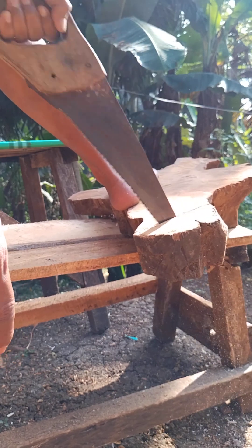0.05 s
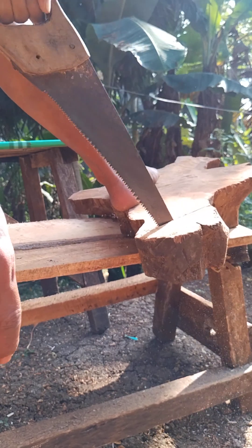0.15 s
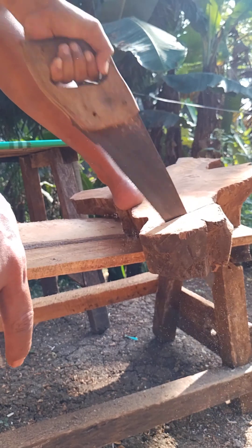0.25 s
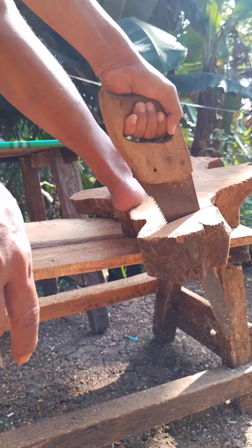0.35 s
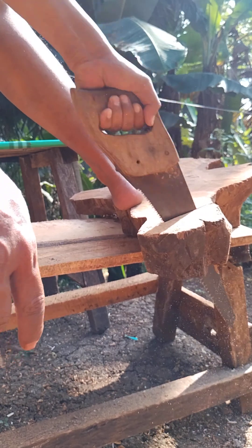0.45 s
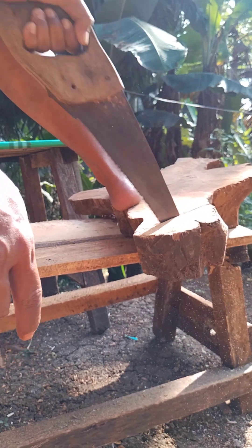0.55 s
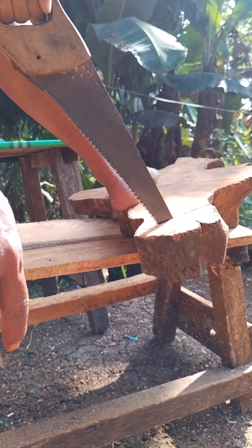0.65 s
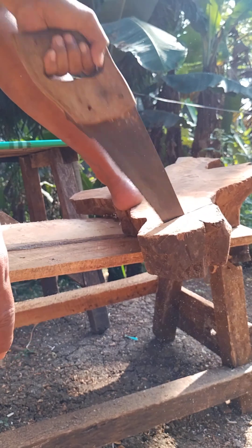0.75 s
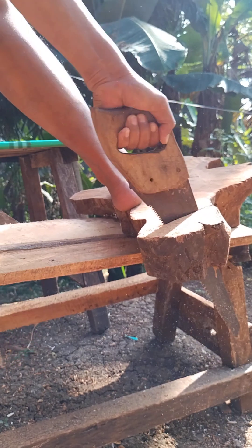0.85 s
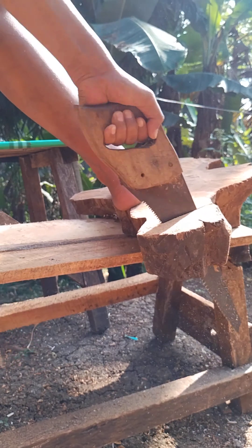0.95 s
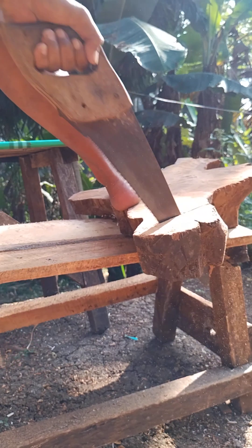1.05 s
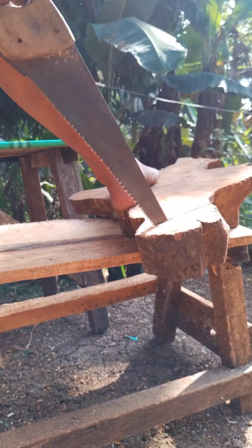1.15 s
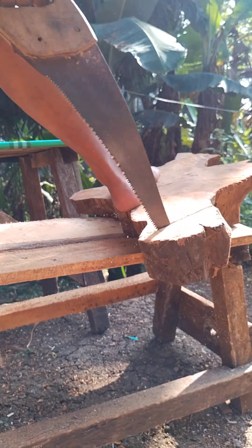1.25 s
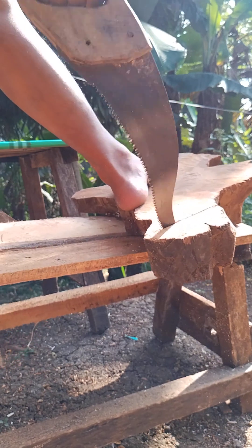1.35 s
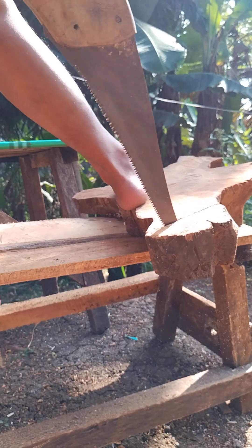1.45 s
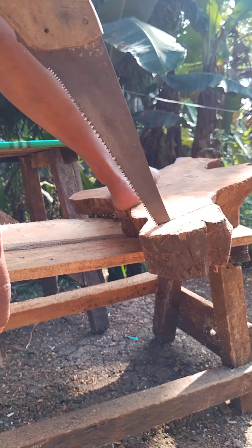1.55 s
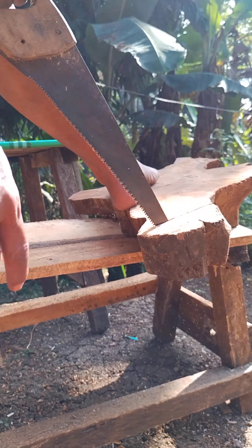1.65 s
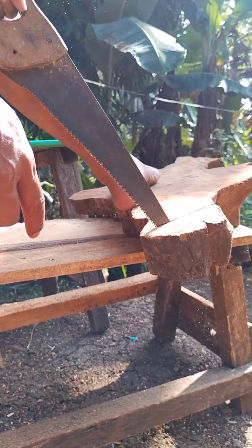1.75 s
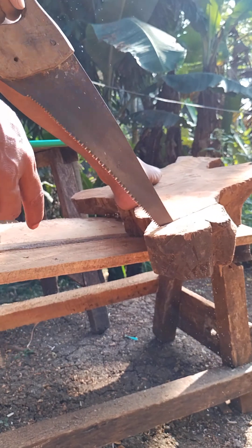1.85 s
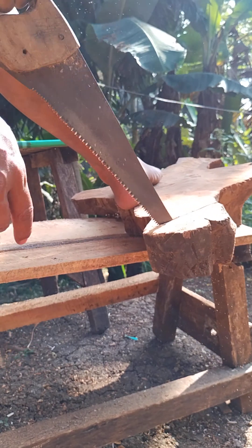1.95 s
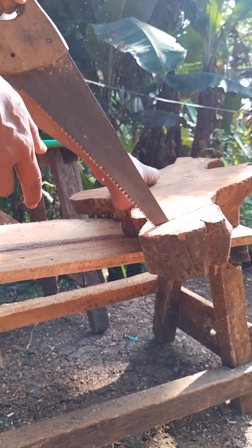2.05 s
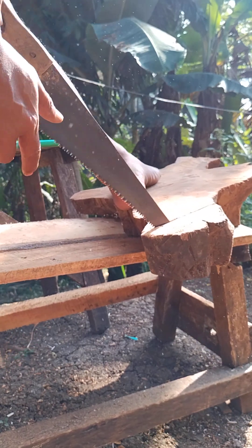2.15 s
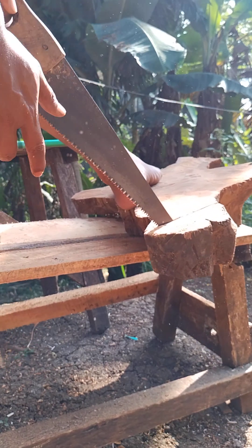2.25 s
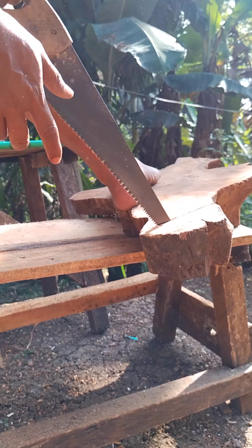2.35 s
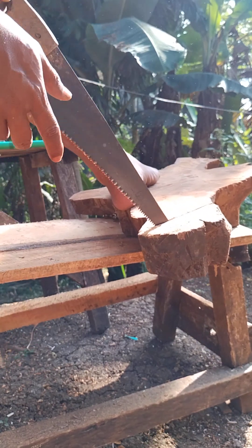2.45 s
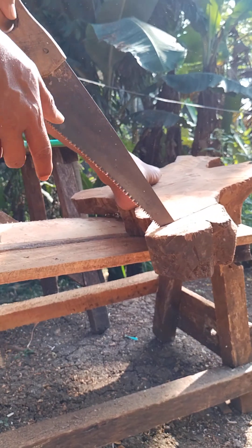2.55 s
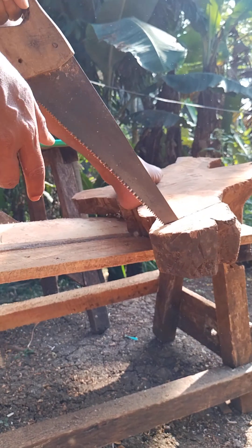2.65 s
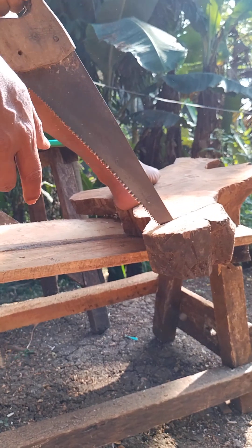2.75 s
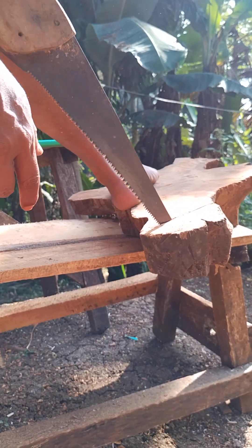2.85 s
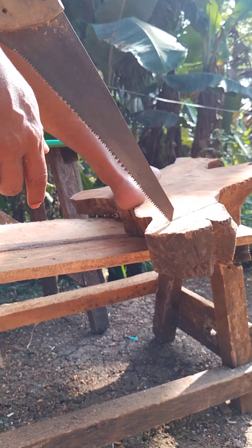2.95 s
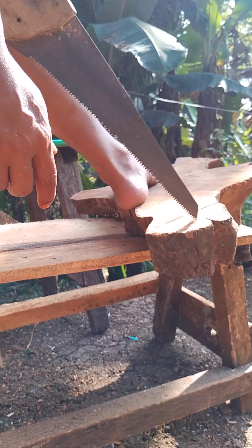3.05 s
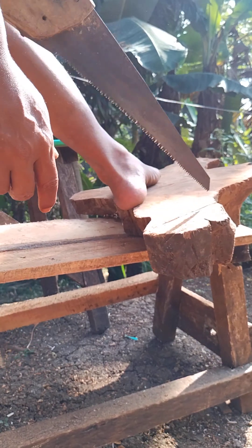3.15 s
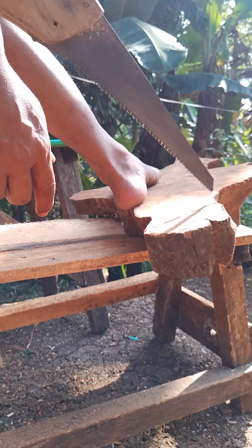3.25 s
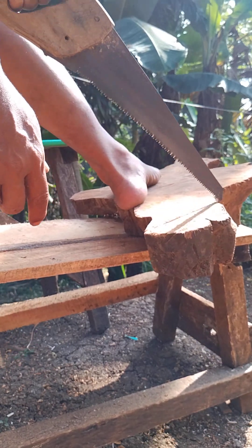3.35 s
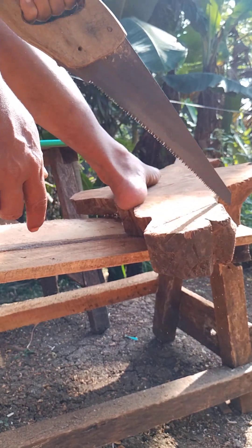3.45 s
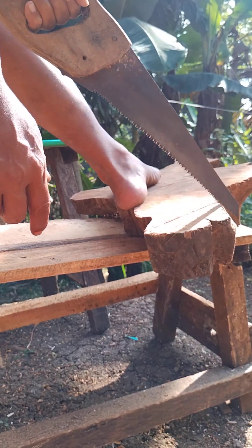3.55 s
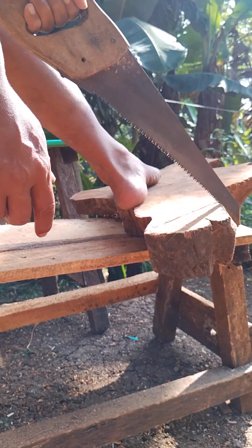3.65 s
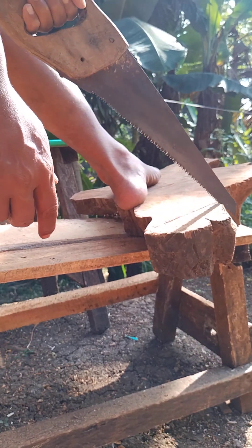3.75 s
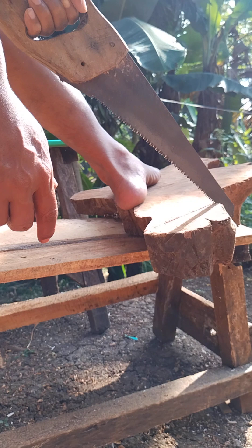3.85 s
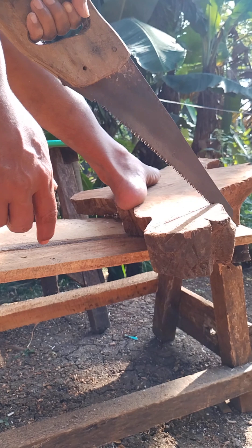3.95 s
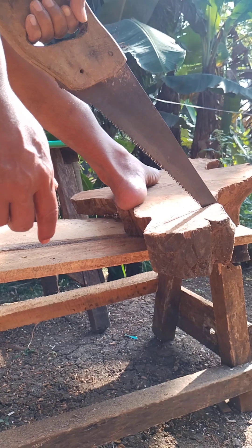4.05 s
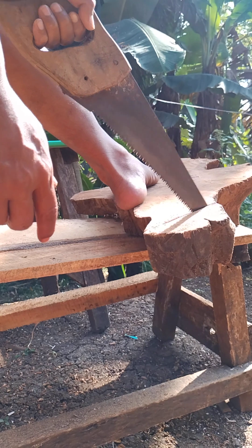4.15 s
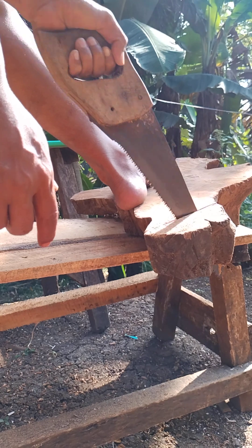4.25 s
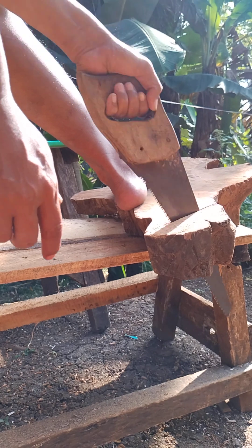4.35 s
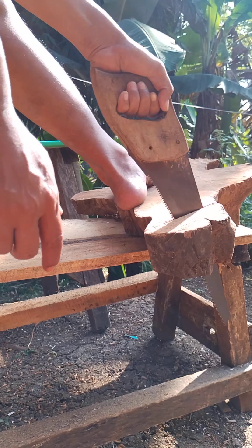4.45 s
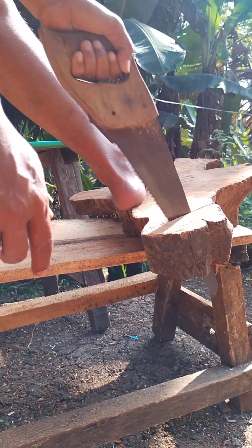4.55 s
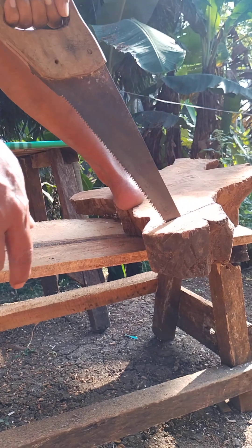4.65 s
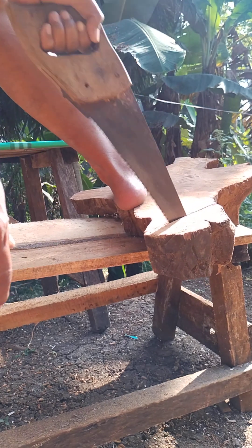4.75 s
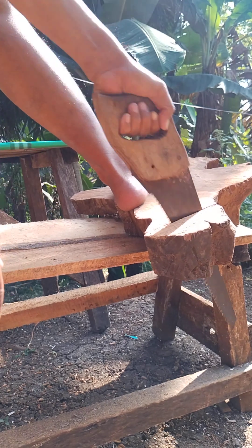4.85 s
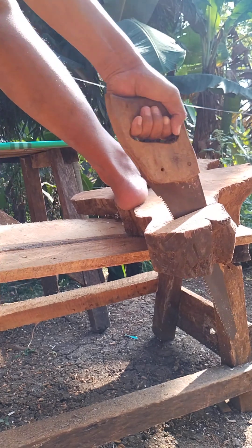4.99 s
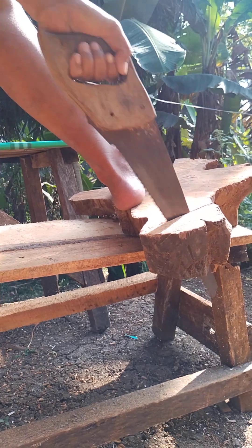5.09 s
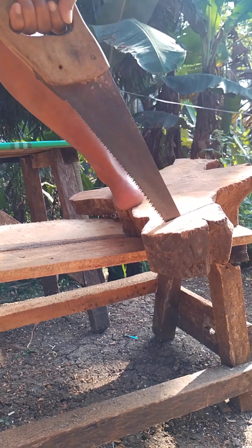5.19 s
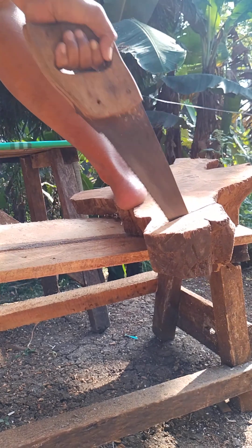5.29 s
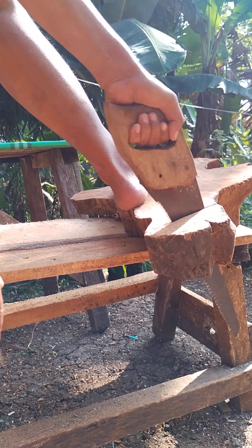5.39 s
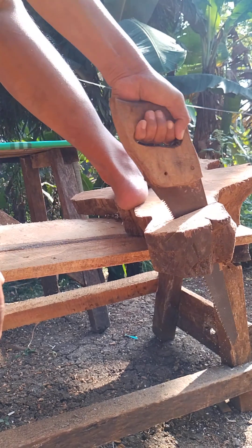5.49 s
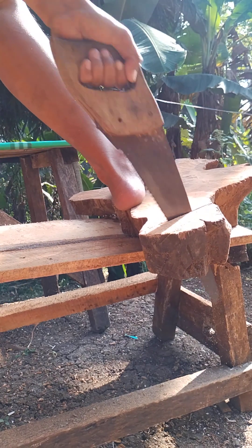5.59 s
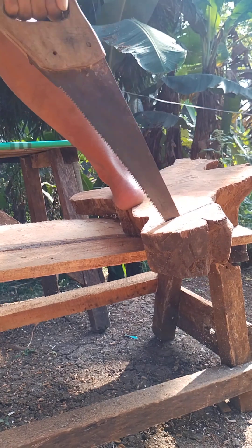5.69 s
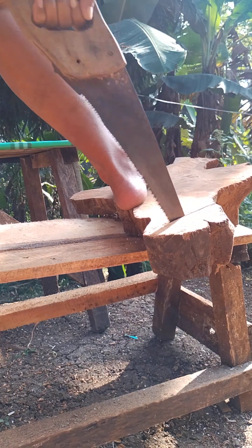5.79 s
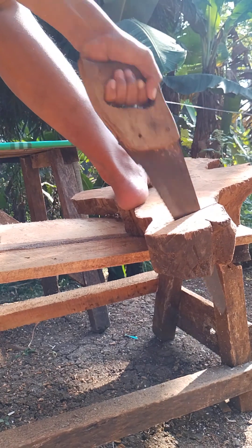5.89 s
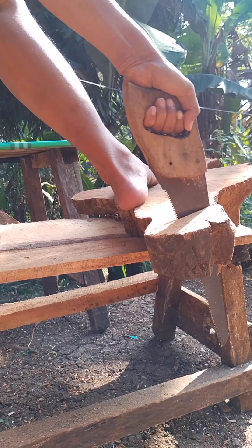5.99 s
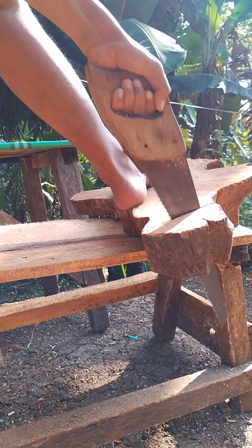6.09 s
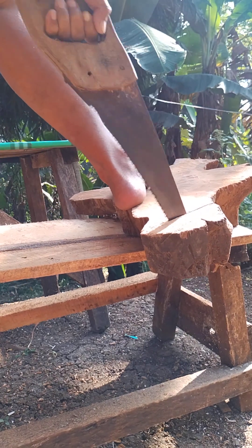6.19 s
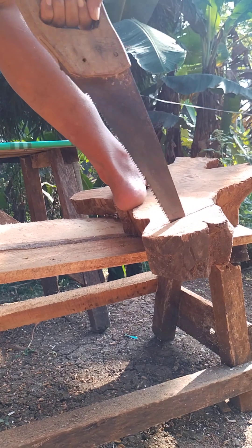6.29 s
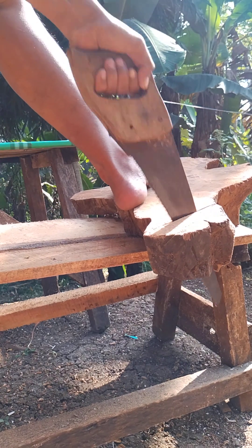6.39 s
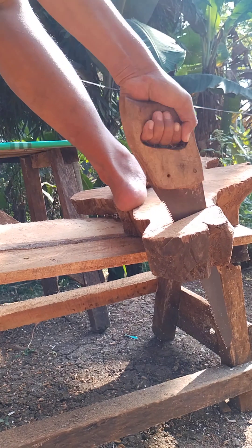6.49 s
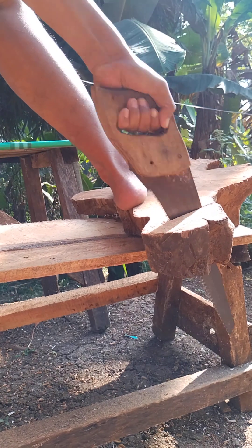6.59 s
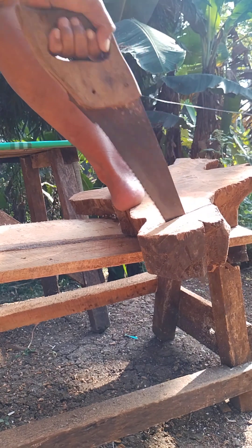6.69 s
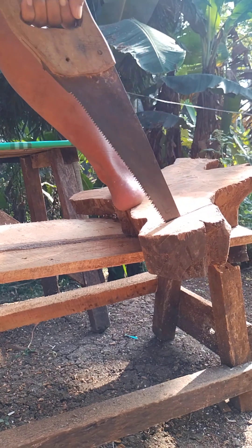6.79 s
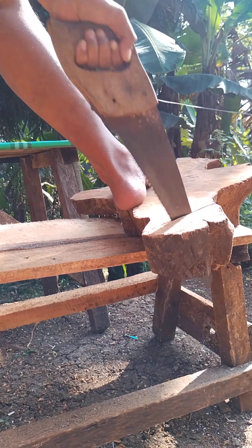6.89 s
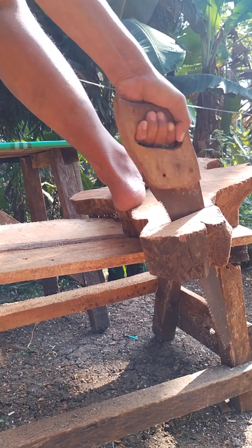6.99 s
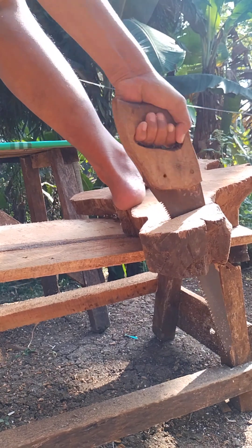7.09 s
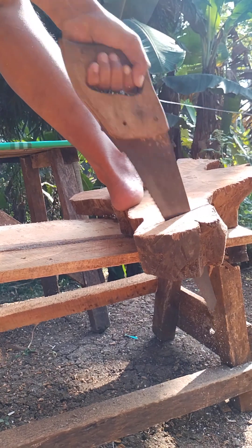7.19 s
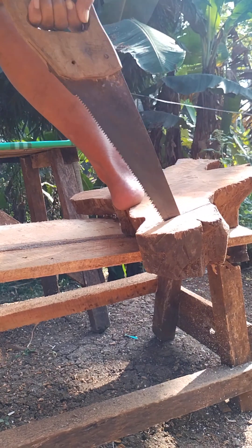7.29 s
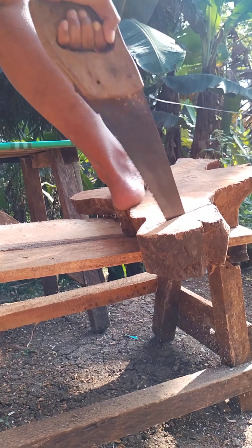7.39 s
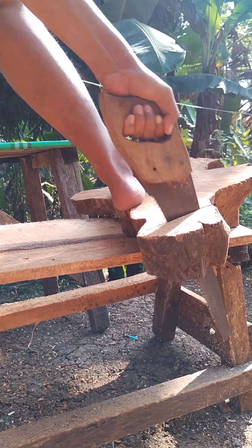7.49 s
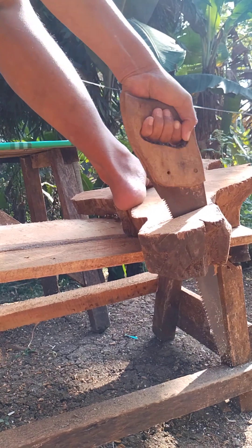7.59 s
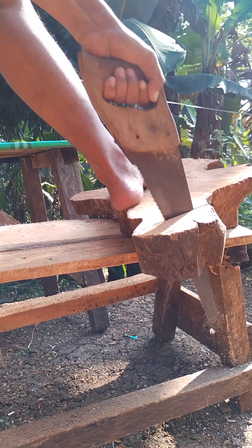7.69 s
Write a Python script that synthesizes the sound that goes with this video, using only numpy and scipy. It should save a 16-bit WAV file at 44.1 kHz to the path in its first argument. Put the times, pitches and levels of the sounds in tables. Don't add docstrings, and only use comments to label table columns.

```python
import sys
import numpy as np
from scipy import signal
from scipy.fft import rfft, irfft
from scipy.io import wavfile
from scipy.ndimage import uniform_filter1d

SR = 44100
rng = np.random.default_rng(int(sys.argv[2]) if len(sys.argv) > 2 else 0)


def log_audio(samples):
    frames = np.atleast_2d(samples).T
    limited = np.clip(frames, -1, 1)
    pcm = np.round(limited * 32767).astype(np.int16)
    wavfile.write(sys.argv[1], SR, pcm)


def gain_from_db(level_db):
    decades = np.asarray(level_db, float) / 20
    return 10 ** decades


N = 340893
HZ, T = np.fft.rfftfreq(N, 1 / SR), np.arange(N) / SR

# (frequency [Hz], level [dB per Hz])
AIR_SPECTRUM = [(12, -53), (20, 5), (75, -1.5), (153, -3), (244, -11.5), (304, -21), (388, -20), (938, -29),
                (4180, -37), (4610, -52), (5610, -33), (7000, -31), (9100, -72), (15400, -120)]
# (frequency [Hz], likeness [0-1])
AIR_LIKENESS = [(60, 0.64), (150, 1), (380, 0.58), (950, 0.083), (2380, 0.027), (5980, 0.02), (15000, 0.02)]
# (start [s], length [s], peak level [dB])
RUMBLE_SWELLS = [
    (-.15, 0.31, -52),
    (1.057, 0.18, -61),
    (1.556, .2, -58),
    (2.95, .25, -72),
    (4.395, 0.31, -67),
    (4.798, 0.17, -61),
    (5.615, 0.21, -54),
    (5.9, 0.19, -72),
    (6.902, 0.26, -57),
    (7.559, .4, -60),
]
# (start [s], length [s], firing rate [Hz], 2nd order level [dB], 3rd order level [dB])
ENGINE_SPELLS = [
    (-.1, 0.44, 89.5, -68, -92),
    (0.856, 0.74, 71.7, -70.5, -82),
    (1.7, 1.48, 81.95, -66, -77),
    (3.353, 0.83, 77.95, -86, -72),
    (4.2, .45, 76.9, -71.5, -93),
    (5.101, .5, 76.2, -88, -76),
    (6.405, 0.57, 66, -78, -71),
    (7.15, 0.68, 75, -88, -71.5),
]
# (frequency [Hz], level [dB per Hz])
CHORUS_SPECTRUM = [(3820, -80), (6500, -61), (6890, -38.5), (7500, -30), (7610, -26), (7950, -18.5),
                   (8560, -5), (9590, -2.5), (10000, -3), (10900, -12.5), (12700, -33), (15600, -46)]
# (frequency [Hz], left over right [dB])
CHORUS_BALANCE = [(6500, 3), (8000, 5.5), (9000, -3), (10000, -11), (11000, -9), (12500, -1), (15000, -11)]
# (time [s], level [dB], left over right [dB])
CHORUS_LEVEL = [(0, -43, 2.5), (.5, -42.5, 3), (1.4, -42, 2), (2.5, -42, 2), (3.5, -42.5, 1.5),
                (4.5, -42, 2), (5.6, -42, 1.5), (6.6, -42, 2), (7.73, -41.5, 3.5)]
# (frequency [Hz], level [dB], fall by 60 dB [s])
LOG_MODES = [(215, 12, 0.018), (344, 5, 0.046), (410, -6.5, 0.088), (607, -8.5, 0.032), (798, -13.5, 0.12),
             (970, -15, 0.13), (1335, -17, 0.041), (1890, -24, 0.018)]
# (time [s], peak [dB], tick re peak [dB], hardness [dB per octave])
KNOCKS = [(1.361, -60, 1, 6), (1.411, -69, 1, -6), (1.511, -62, -2, -6), (1.625, -51.5, -7, -4),
          (1.659, -61, 0, -5), (2.211, -60, -6, 8), (2.254, -64, -5, 9), (2.593, -65, -3, -5),
          (2.68, -64, -4, -12), (2.706, -79, -1, 4), (2.85, -79, -8, 9), (3.105, -41, -6, 2),
          (3.131, -50, -10, 2), (3.645, -60, -9, 6), (3.789, -60, 1, 10.5), (3.889, -69, -5, 11),
          (3.961, -78, -7, 9), (4.087, -77, -7, -2), (0.526, -53, -12, 0.0), (1.027, -54, -12, -1),
          (5.574, -56, -10, -2), (6.636, -58, -12, -2), (7.168, -58, -12, 0.0)]
# (time [s], peak level [dB])
TICKS = [(1.3615, -57), (1.411, -52), (1.6206, -49), (2.5994, -65), (2.6808, -56), (2.7084, -47),
         (2.848, -58), (3.101, -46), (3.152, -66), (3.9195, -59.5), (3.963, -46), (4.087, -48)]
# (time [s], peak level [dB], frequency [Hz])
JOLTS = [
    (0.335, -41, 182),
    (0.836, -41, 192),
    (4.86, -42, 187.9),
    (5.373, -47.5, 241),
    (5.897, -40, 173.7),
    (6.433, -40, 166),
    (6.97, -41.5, 186),
    (6.999, -52, 151),
    (7.482, -51, 320.5),
]
# (start [s], length [s], peak bite [dB], share of stroke at top speed [0-1], pointedness [power])
STROKES = [(-0.01, 0.27, -47.5, 0.47, 2.9), (0.235, 0.32, -44, 0.45, 6.8), (0.529, 0.23, -49.5, 0.45, 1.65),
           (0.73, 0.31, -43.5, 0.54, 6.3), (1.008, 0.34, -47.5, 0.42, 4.13),
           (4.255, 0.25, -56.5, 0.56, 0.86), (4.556, 0.23, -51, 0.53, 2), (4.781, 0.24, -44.5, 0.54, 2.9),
           (5.078, 0.24, -48, 0.44, 2.3), (5.28, 0.3, -45.5, 0.51, 4.8), (5.528, 0.32, -47.5, 0.56, 2.8),
           (5.795, 0.3, -46, 0.61, 3.34), (6.121, 0.27, -49.5, 0.43, 2.8), (6.33, 0.3, -47.5, 0.56, 4.6),
           (6.641, 0.25, -49.5, 0.47, 2.03), (6.884, 0.32, -45.0, 0.43, 6.2),
           (7.156, 0.29, -49.5, 0.5, 2.4), (7.39, 0.3, -45.5, 0.52, 5.7), (7.665, 0.46, -40, 0.58, 2.07)]
# (start [s], length [s], peak bite [dB], pointedness [power], log boom re bite [dB])
SCRAPES = [(1.343, 0.055, -74.5, 1.2, -2), (1.394, 0.04, -75, 1.2, -7), (1.455, 0.077, -73.5, 1.1, -7),
           (1.609, 0.079, -74, 1.4, -6), (1.722, 0.049, -73.5, 1.3, -21), (1.925, 0.09, -82, 0.85, -9),
           (2.173, 0.27, -101.5, 0.53, 26), (2.447, 0.068, -77.5, 0.96, -3.), (2.547, 0.094, -70.5, 1.4, 1),
           (2.649, 0.098, -74.5, 0.66, -4.), (2.83, 0.036, -79, 1.5, -7), (2.903, .19, -68.5, 1.4, 1),
           (3.085, .08, -72, 0.57, 7), (3.41, .06, -95, 1., -9.), (3.617, 0.055, -79, 1.4, 7),
           (3.77, 0.066, -81, 1., 8), (3.856, 0.11, -68.5, 1.7, 7.5), (3.944, 0.051, -64, 2.7, 2),
           (3.96, 0.079, -73, 0.91, 7), (4.062, .075, -69.5, 1.3, 8), (4.227, .085, -51.5, 3., -5.5),
           (4.256, .034, -43, 2.2, -28)]
# (start [s], end [s])
SAWING = [
    (-.1, 1.34),
    (4.23, 7.9),
]
# (level at full bite [dB], gain over the stroke [dB])
BOOM = [
    (-8, -2.5),
    (-6.5, 8.5),
]
# (level at full bite [dB], gain over the stroke [dB])
FIZZ = [
    (-7, -4),
    (-8, -10),
]
# (frequency [Hz], level [dB per Hz])
RASP_SPECTRUM = [(150, -13), (300, -17.5), (600, -5), (1200, -7.5), (2200, -5), (3500, -7), (5000, -6.5),
                 (6800, -6), (8300, -0.5), (9800, -0.5), (11200, -6.5), (13000, -13.5), (15500, -16.5)]
# (frequency [Hz], width [Hz], lift [dB])
BODY = [(354, 87, 11), (538, 36, 4.5), (998, 254, 10), (1407, 110, 9), (1798, 260, 8), (2403, 47, 7.5),
        (3720, 27, 3.5), (5660, 670, 1.5)]
# (frequency [Hz], likeness [0-1])
SAW_LIKENESS = [(100, 0.2), (500, 0.98), (1200, 0.38), (2500, 0.13), (3500, 0.093), (8000, 0.029),
                (15000, 0.19)]
# (frequency [Hz], left over right [dB])
SAW_BALANCE = [(100, 8), (300, -4.5), (600, 0.5), (2000, 0), (5000, -0.5), (8000, 3.5), (10000, -14.5),
               (12000, -1), (15000, 0.5)]
# (time [s], share of kerf band lost [0-1], kerf band centre [Hz])
LIFTED = [
    (0, 0.11, 2300),
    (2.5, 0.26, 2300),
    (2.9, 0.46, 2320),
    (3.2, 0.78, 2190),
    (3.84, 1, 2995),
    (4.05, 0.7, 2180),
    (4.17, 0.62, 2170),
    (4.23, 0.32, 2293),
    (7.73, 0.16, 2300),
]


def evened(x):
    return x / np.sqrt(np.mean(x ** 2) + 1e-20)


def read(points):
    f, value = np.transpose(points)
    return np.interp(np.log(HZ + 1), np.log(f + 1), value)


def curves(rows):
    s, *columns = np.transpose(rows)
    return [np.interp(T, s, c) for c in columns]


def drift(rate_hz):
    return evened(irfft(rfft(rng.standard_normal(N)) / (1 + (HZ / rate_hz) ** 4) * (HZ > .1), N))


def arch(start, length, top=.5, pointed=1.):
    done = np.clip((T - start) / length, 0, 1)
    bent = done ** (np.log(.5) / np.log(np.clip(top, .1, .9)))
    return abs(np.sin(np.pi * bent)) ** pointed * (done > 0) * (done < 1), done


def resonate(x, hz, width):
    turn = np.exp(2j * np.pi * np.cumsum(hz * np.ones(N)) / SR)
    r = np.exp(-np.pi * width / SR)
    return 2 * (turn * signal.lfilter([1 - r], [1, -r], x / turn)).real


def ports(a, b, same, balance_db, lag_s):
    left, same = rfft(a), np.clip(same, -1, 1)
    right = same * left + np.sqrt(1 - same ** 2) * rfft(b)
    late_left = left * np.exp(-2j * np.pi * HZ * lag_s)
    return np.array([late_left * gain_from_db(balance_db / 2), right / gain_from_db(balance_db / 2)])


def air():
    z = ports(*rng.standard_normal((2, N)), read(AIR_LIKENESS), 1.3 * (HZ < 150), 0.)
    z = z * gain_from_db(read(AIR_SPECTRUM))
    low = 1 / (1 + (HZ / 130) ** 4)
    rumble = evened(irfft(z * low, N))
    steady = evened(irfft(z * (1 - low), N))
    wind = gain_from_db(-61 + 1.5 * drift(4.1))
    for start, length, db in RUMBLE_SWELLS:
        wind += gain_from_db(db) * arch(start, length)[0] ** 2
    return rumble * wind * gain_from_db(-6.5) + steady * gain_from_db(-68.5)


def engine():
    waver = 1 + 0.0083 * drift(11.0)
    second, third = gain_from_db(1.2 * drift(3)), gain_from_db(3.0 * drift(4))
    out = np.zeros(N)
    for start, length, hz, second_db, third_db in ENGINE_SPELLS:
        turn = 2 * np.pi * np.cumsum(hz * waver) / SR
        orders = gain_from_db(second_db) * second * np.sin(2 * turn) + gain_from_db(third_db) * third * np.sin(3 * turn)
        out += arch(start, length, .5, .3)[0] * orders
    return np.sqrt(2) * out


def chorus():
    clicks = gain_from_db(2.0 * rng.exponential(1, (2, N))) * rng.standard_normal((2, N))
    hiss = irfft(ports(*clicks, 0., read(CHORUS_BALANCE), 0.) * gain_from_db(read(CHORUS_SPECTRUM)), N)
    db, pan_db = curves(CHORUS_LEVEL)
    shimmer_db = .5 * drift(17) + 0.17 * drift(300)
    return evened(hiss) * gain_from_db(db + np.outer([.5, -.5], pan_db) + shimmer_db)


def crickets():
    hz, width, db = 4560, 260, -76
    band = irfft(rfft(rng.standard_normal((2, N))) / (1 + (2 * (HZ - hz) / width) ** 8), N)
    hush = 0.68 * arch(3.5, 0.24, 0.8, 0.88)[0]
    return evened(band) * gain_from_db(db + 1.0 * drift(6)) * (1 - hush)


def place_hits(hits):
    out = np.zeros((2, N + SR))
    for s, sound in hits:
        out[:, round(s * SR):][:, :SR // 4] += sound
    return out[:, :N]


def burst(order, low_hz, high_hz):
    band = signal.butter(order, [low_hz, high_hz], "band", fs=SR)
    return signal.lfilter(*band, rng.standard_normal((2, SR // 4)))


def jolts():
    t = T[:SR // 4]
    return place_hits((s, gain_from_db(db - 60 * t / 0.02) * np.sin(2 * np.pi * hz * t)) for s, db, hz in JOLTS)


def knocks():
    t, hits = T[:SR // 4], []
    mixes = rng.standard_normal((len(KNOCKS), len(LOG_MODES)))
    for (s, db, tick_db, hard_db), mix in zip(KNOCKS, mixes):
        ring = 0
        for (hz, mode_db, t60), m in zip(LOG_MODES, mix):
            level = gain_from_db(mode_db + m + hard_db * np.log2(hz / 500) - 60 * t / t60)
            ring = ring + level * np.sin(2 * np.pi * hz * (1 + 0.032 * m) * t)
        tick = gain_from_db(tick_db - 60 * t / 0.024) * burst(2, 2000, 7000)
        onset = 1 - np.exp(-t / 0.0022)
        hits.append((s, gain_from_db(db - 3.5) * (ring * onset + tick)))
    return place_hits(hits)


def tip_ticks():
    t = T[:SR // 4]
    return place_hits((s, gain_from_db(db + 3 - 60 * t / .014) * burst(1, 1500, 7500)) for s, db in TICKS)


def contact():
    rest_db, turn_db = np.array([-100, -94, -89]), np.array([-79.5, -78., -82.])
    sawing = sum(arch(a, b - a, .5, .1)[0] for a, b in SAWING)
    power = gain_from_db(rest_db)[:, None] ** 2 + np.outer(gain_from_db(turn_db), sawing) ** 2
    for k, (start, length, db, top, pointed) in enumerate(STROKES):
        speed, done = arch(start, length, top, pointed)
        power[0] += (gain_from_db(db) * speed) ** 2
        for row, share, (re_bite_db, gain_db) in ((1, 0.35, BOOM[k % 2]), (2, 0.3, FIZZ[k % 2])):
            level_db = db + re_bite_db - share * (db + 43.5) + gain_db * (done - .5)
            power[row] += (gain_from_db(level_db) * speed ** (1 - share)) ** 2
        if k % 2 == 0:
            power[1] += (gain_from_db(-73.5) * arch(start + 0.012, 0.036)[0]) ** 2
    for start, length, db, pointed, boom_db in SCRAPES:
        levels = gain_from_db(db + np.array([0, boom_db, -1]))
        power += np.outer(levels, arch(start, length, .55, pointed)[0]) ** 2
    return 10 * np.log10(power)


def teeth(bite_db, per_s=12000, spread_db=0.95, gate=0.086):
    tooth_hz = 130 * gain_from_db(.35 * np.clip(bite_db + 52, -30, 10)) * (1 + .25 * drift(30))
    since_entry = np.cumsum(tooth_hz) / SR % 1
    entry = 1 - gate + gate * 3 * np.exp(-3 * since_entry)
    sizes = gain_from_db(spread_db * np.minimum(rng.exponential(1, (2, N)), 5)) * rng.choice([-1., 1.], (2, N))
    snaps = rng.random((2, N)) < per_s / SR
    return evened(sizes * snaps * entry * gain_from_db(1.2 * drift(68)))


def flexing(x, patchy_db=3.0, fine_db=4.0):
    z = signal.stft(x, nperseg=1024, noverlap=768)[2]
    wide, fine = rng.standard_normal((2, *z.shape))
    wide = evened(uniform_filter1d(uniform_filter1d(wide[:1], size=12, axis=1), size=6, axis=2))
    fine = evened(uniform_filter1d(uniform_filter1d(fine, size=2, axis=1), size=10, axis=2))
    z = z * gain_from_db(patchy_db / 2 * wide + fine_db * fine)
    return signal.istft(z, nperseg=1024, noverlap=768)[1][:, :N]


def cut(clicks, bite_db, boom_db, fizz_db):
    body = 1 + sum((gain_from_db(db) - 1) / (1 + 2j * (HZ - hz) / width) for hz, width, db in BODY)
    pair = ports(*clicks, read(SAW_LIKENESS), read(SAW_BALANCE), 0.00011) * gain_from_db(read(RASP_SPECTRUM)) * body
    pair = rfft(flexing(irfft(pair, N)))
    low, high = 1 / (1 + (HZ / 2600) ** 4), 1 / (1 + (9500 / (HZ + 1)) ** 6)
    out = evened(irfft(pair * low, N)) * gain_from_db(boom_db + 2.0)
    out += evened(irfft(pair * (1 - low) * (1 - high), N)) * gain_from_db(bite_db + 10.0)
    out += evened(irfft(pair * high, N)) * gain_from_db(fizz_db + 11.0)
    lost, kerf_hz = curves(LIFTED)
    return out - np.clip(lost, 0, 1) * resonate(out, kerf_hz, 1500)


def free_blade(click, place, boom_db):
    hz, width = 760 * (1 - 1.25 * (place - .5)), 60
    ring = resonate(resonate(click, hz, width), hz, width)
    return evened(ring) * gain_from_db(boom_db - 11)


def bench(click, place, boom_db):
    return resonate(click * (1 - place) ** 2 * gain_from_db(boom_db + 22.6), 341, 24)


def saw():
    bite_db, boom_db, fizz_db = contact()
    clicks = teeth(bite_db)
    place = sum(arch(*row[:2])[1] * (-1) ** k for k, row in enumerate(STROKES))
    out = cut(clicks, bite_db, boom_db, fizz_db)
    return out + bench(clicks[1], place, boom_db) + free_blade(clicks[0], place, boom_db)


def scene():
    background = air() + engine() + chorus() + crickets()
    return background + jolts() + knocks() + tip_ticks() + saw()


def low_pass(x):
    return signal.sosfilt(signal.butter(12, 15780, fs=SR, output="sos"), x)


def record(dry):
    limited = irfft(rfft(dry) / (1 + (HZ / 15800) ** 300), N)
    return low_pass(limited)


dry = scene()
out = record(dry)
log_audio(out)
```